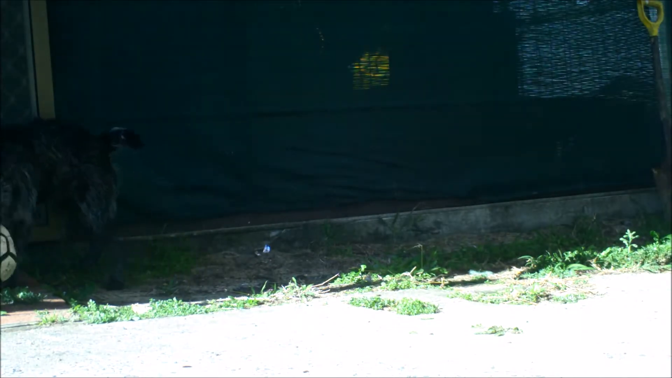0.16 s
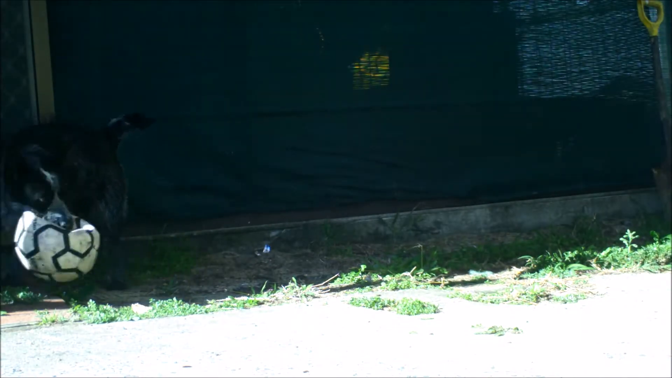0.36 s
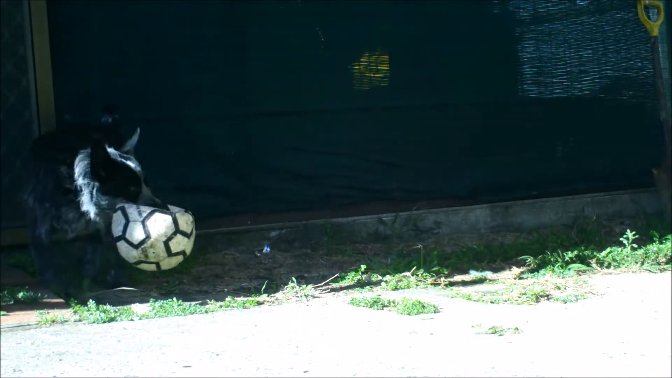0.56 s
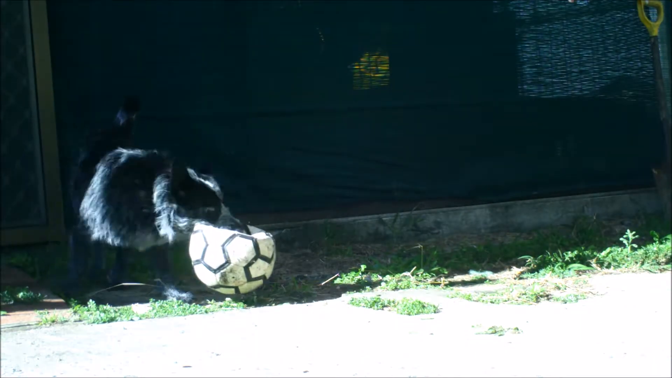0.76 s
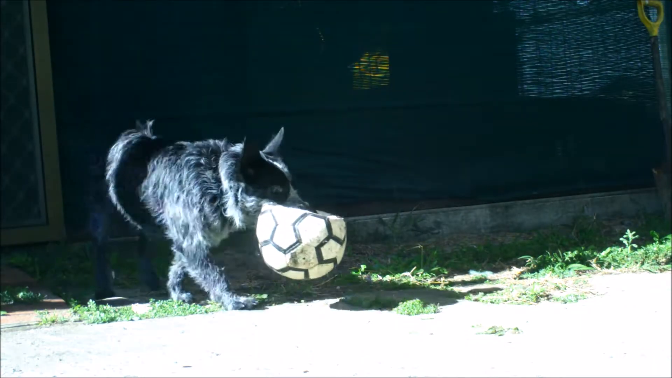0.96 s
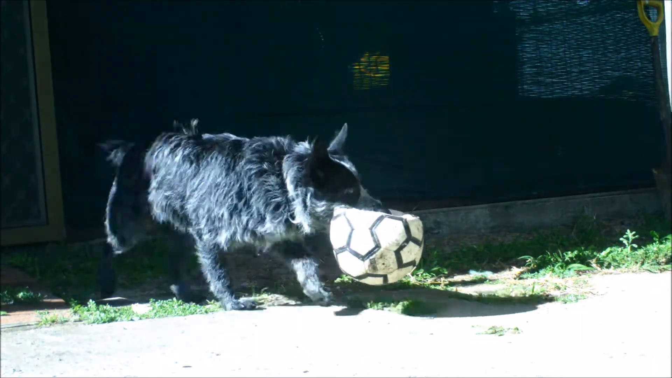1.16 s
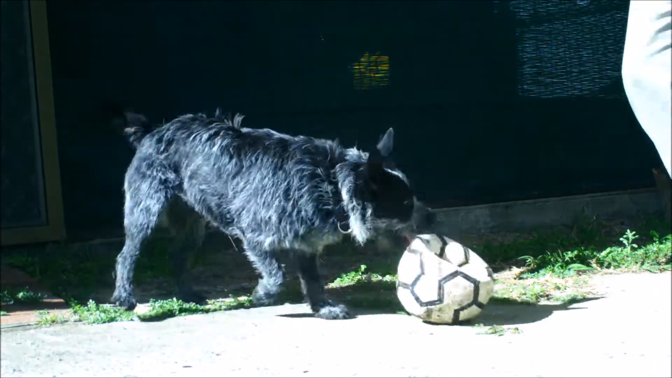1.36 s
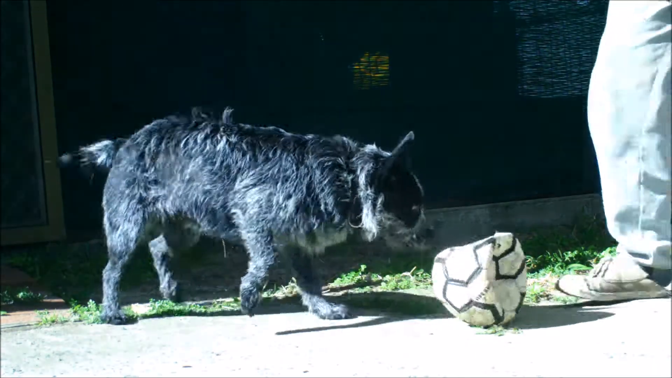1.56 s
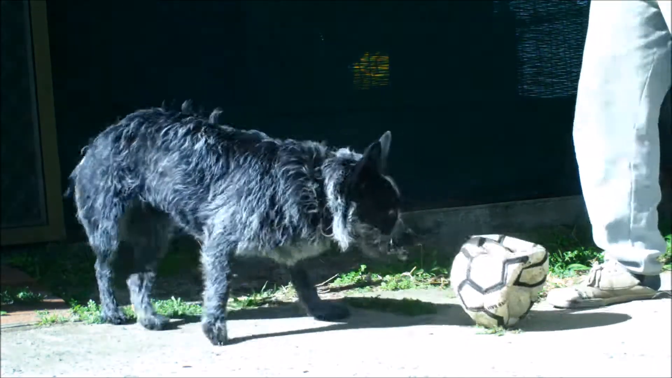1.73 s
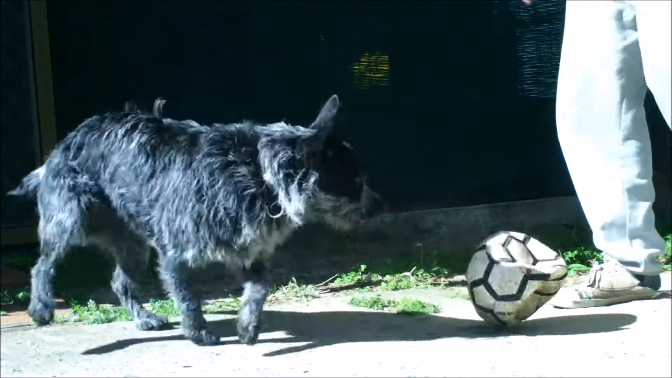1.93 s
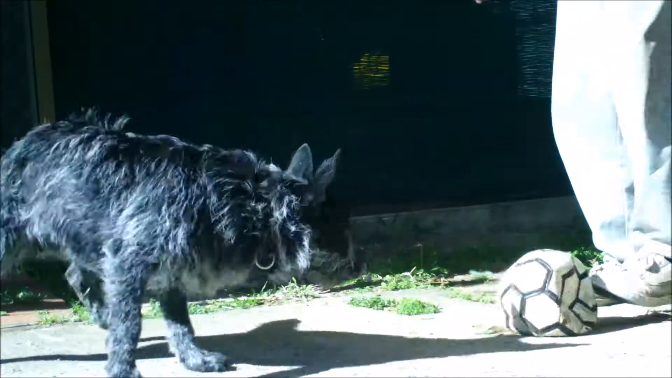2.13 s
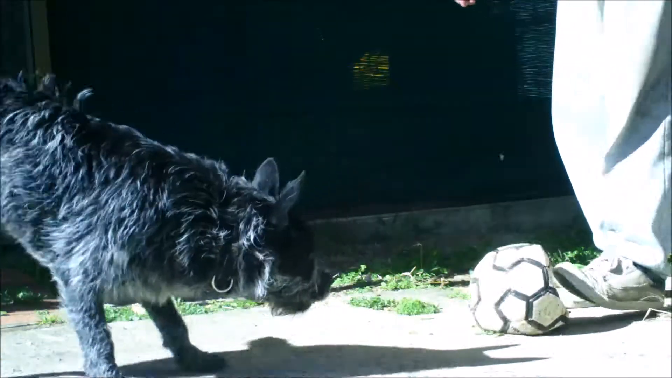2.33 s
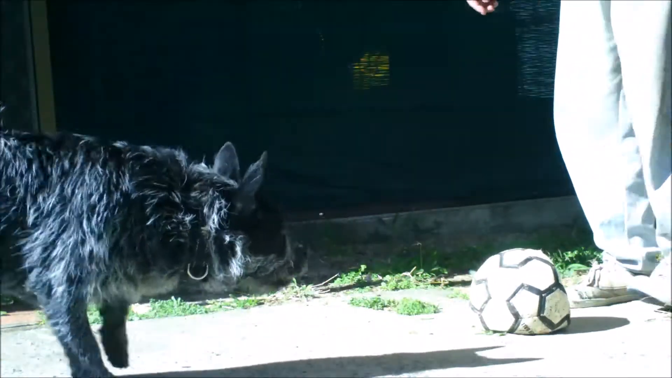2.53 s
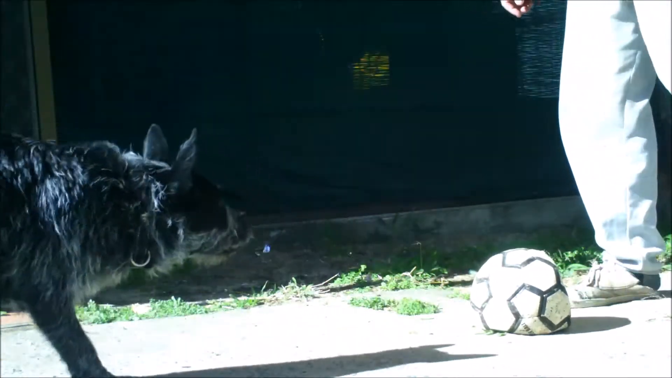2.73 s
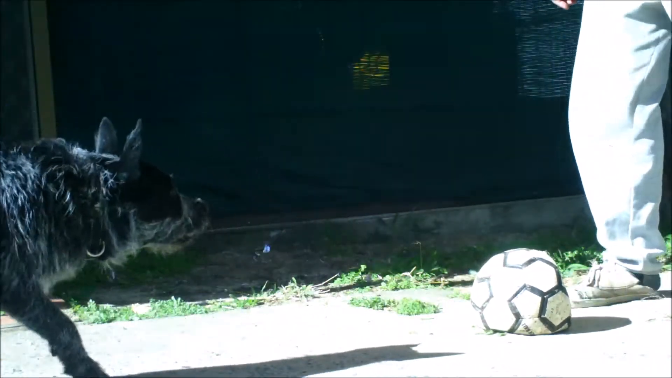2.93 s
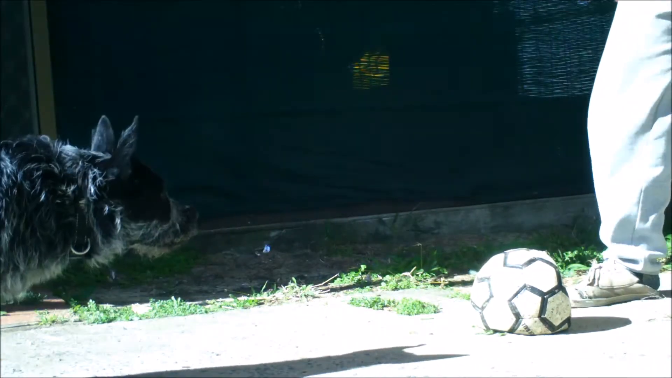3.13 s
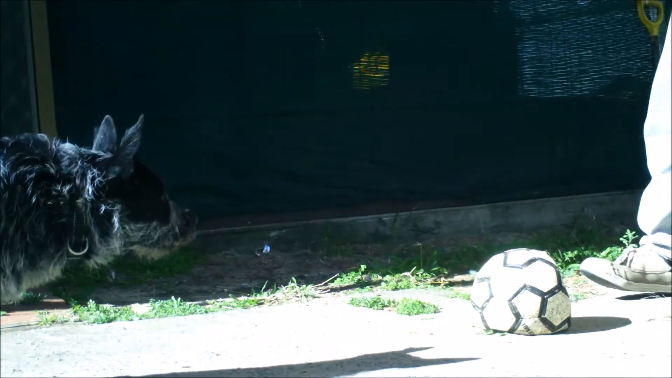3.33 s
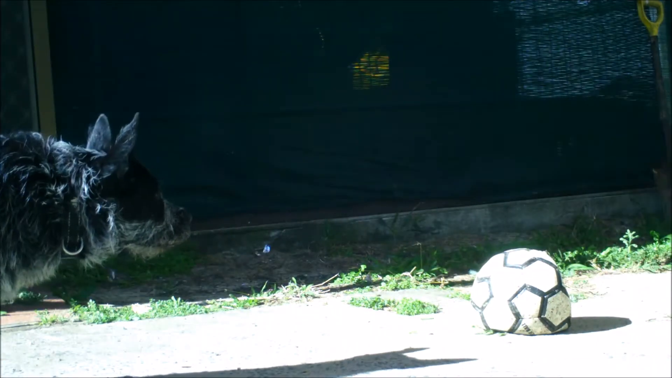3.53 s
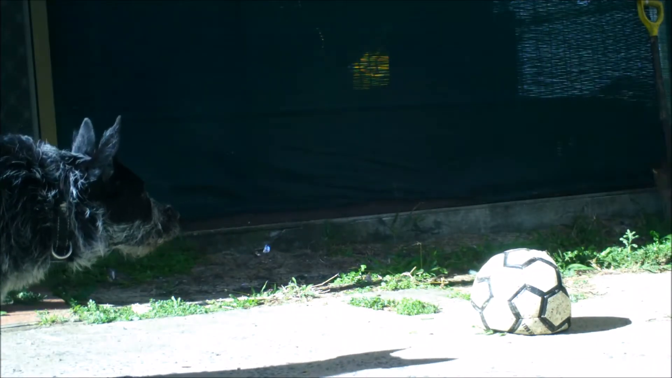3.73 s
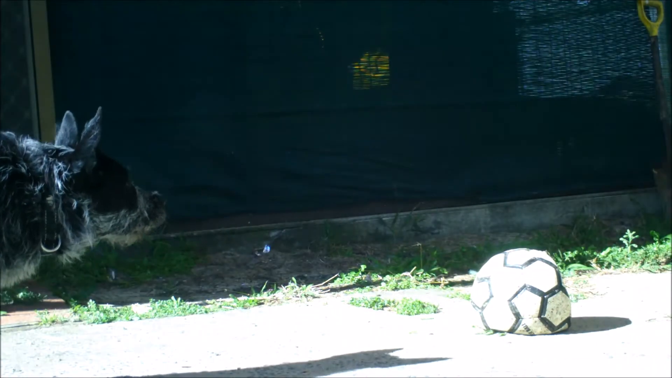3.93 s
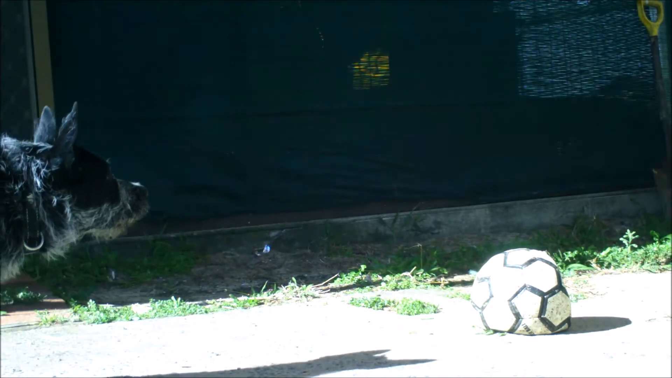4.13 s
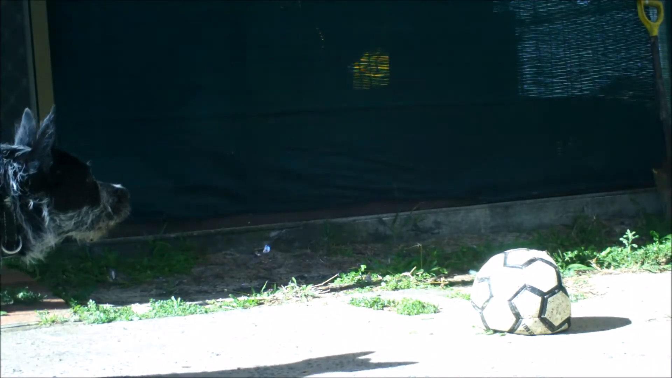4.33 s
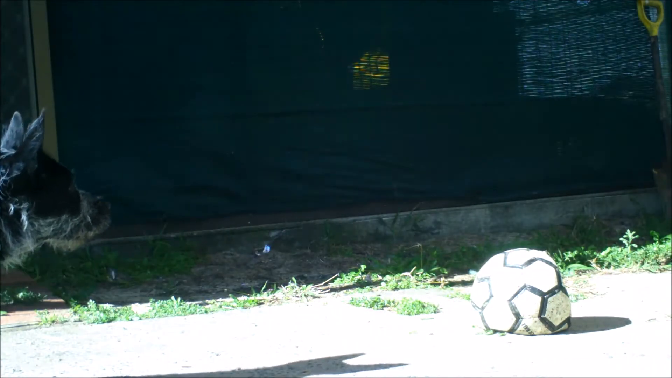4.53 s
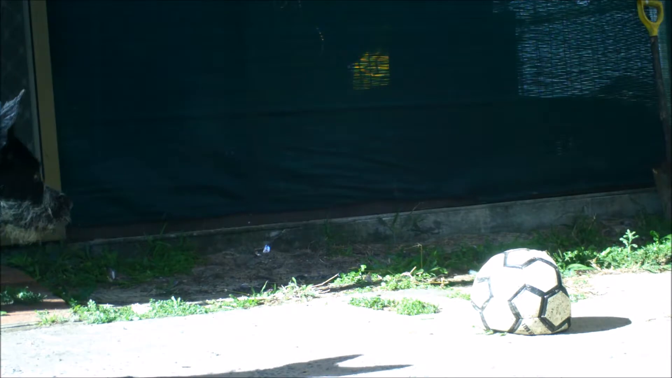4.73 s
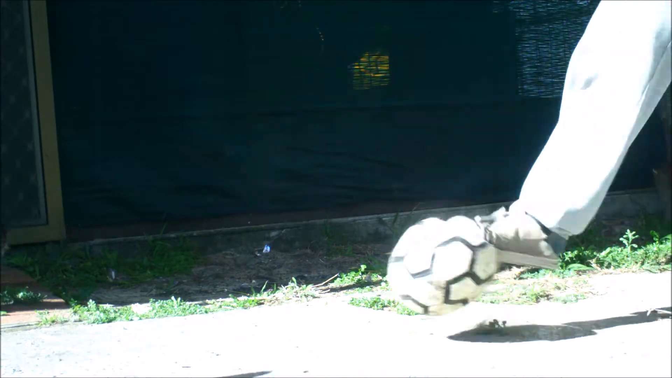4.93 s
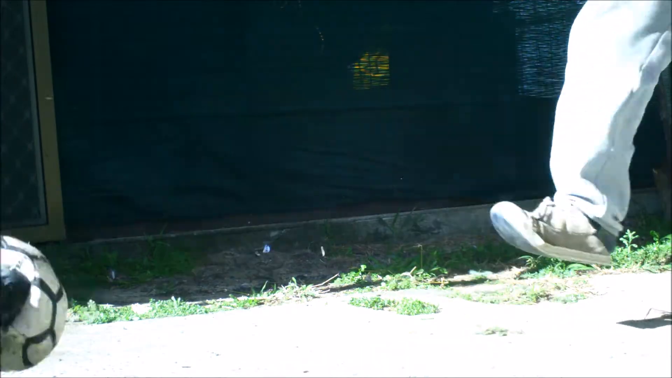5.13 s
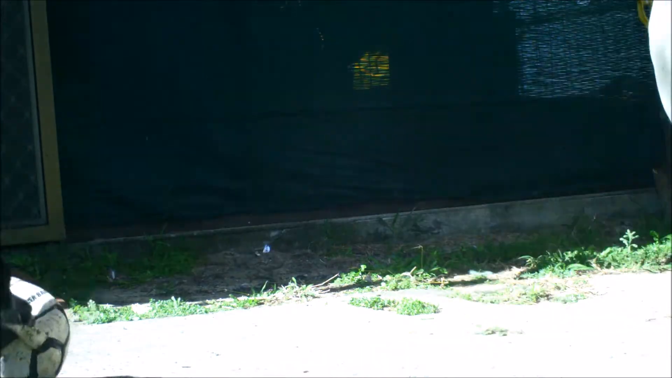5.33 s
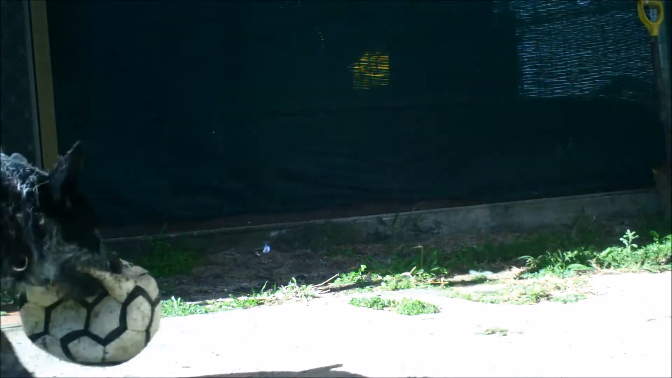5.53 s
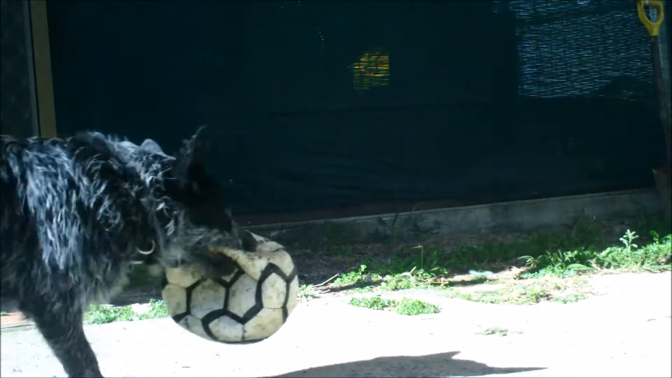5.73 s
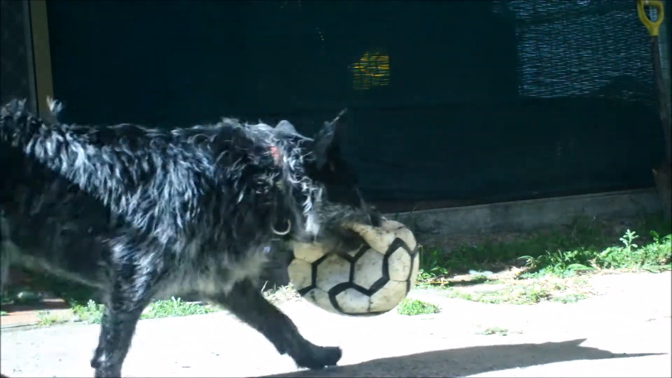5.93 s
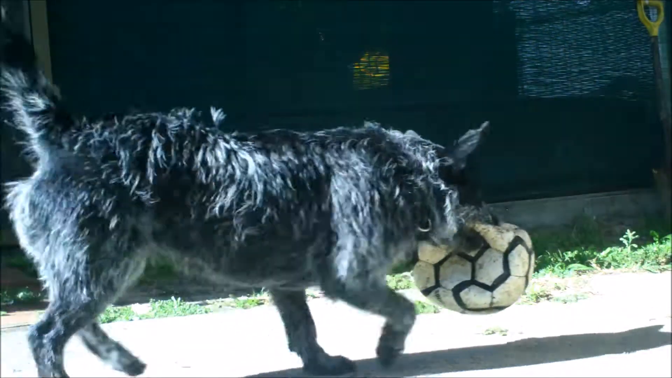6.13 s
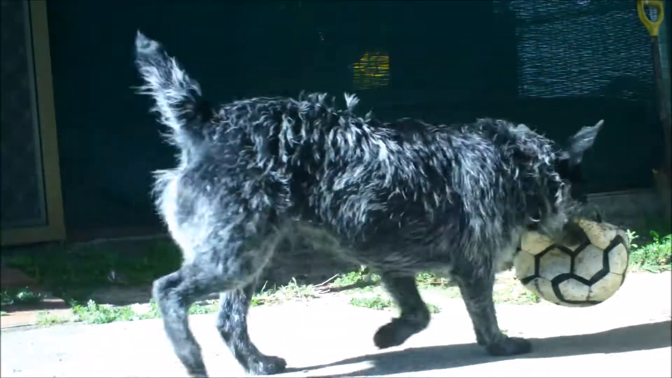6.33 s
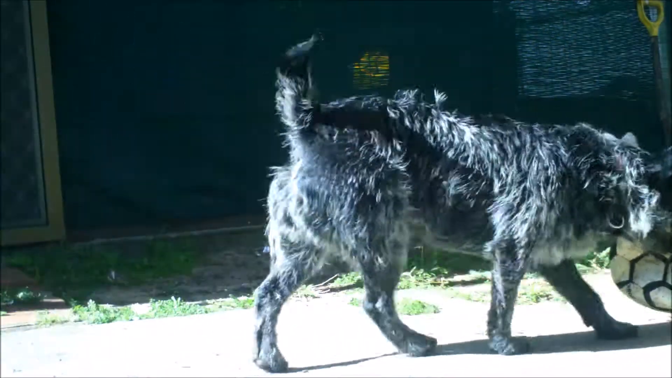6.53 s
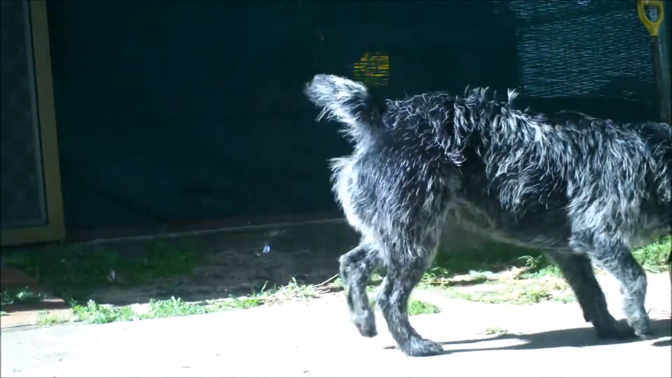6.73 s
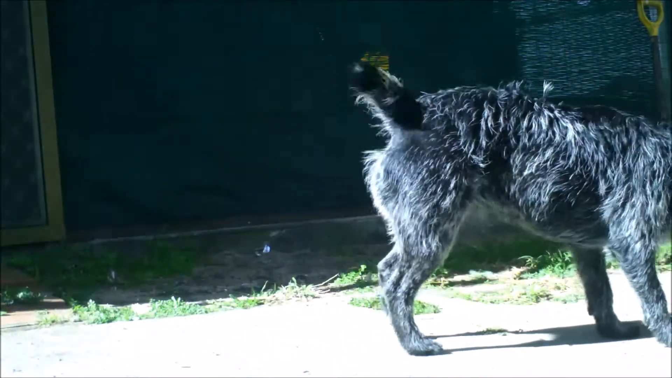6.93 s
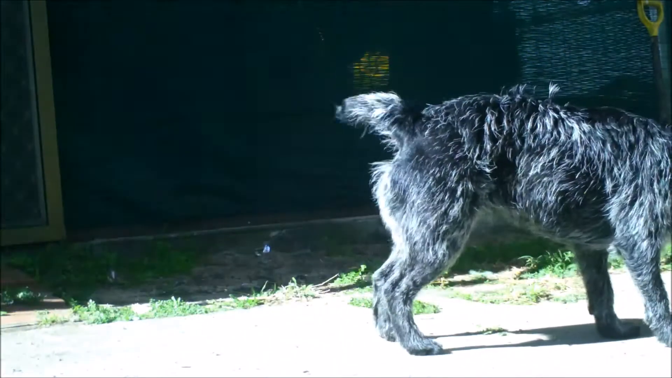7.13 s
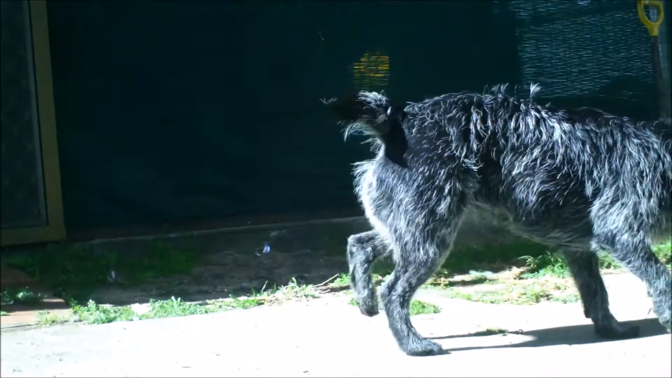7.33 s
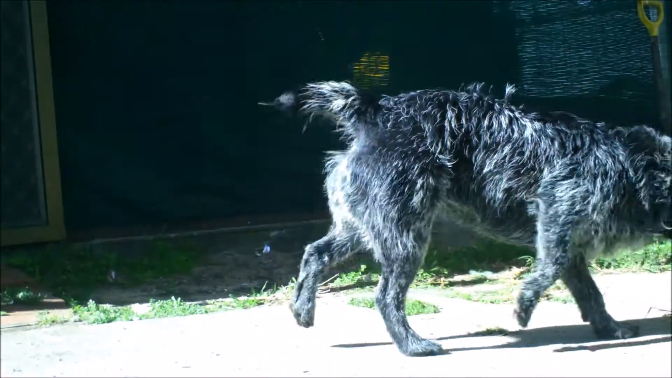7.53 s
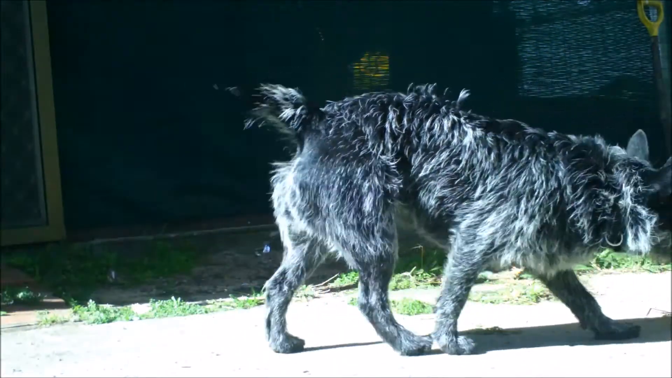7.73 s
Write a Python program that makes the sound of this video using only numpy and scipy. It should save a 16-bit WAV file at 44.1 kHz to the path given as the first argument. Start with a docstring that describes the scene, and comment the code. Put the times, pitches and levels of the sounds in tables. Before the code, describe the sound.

For the first half second a dog's paws scrape on gritty concrete close to the microphone, with a sharp click and a soft knock as it grabs a half-flat football. Around 1.4 and 1.6 seconds the ball drops with hollow, leathery slaps that ring briefly, and a lighter knock follows near 2.2 seconds. Until about 4.7 seconds there are only scattered scuffs of paws and shoes, claw ticks and small snaps of grit. At 4.8 seconds a tiny rubbery squeak leads into a kick, the loudest sound. The ball knocks again at 5.1 seconds, and the dog catches it with a sharp snap and slap near 5.3. Light paw steps, ticking claws and scrapes continue until the end, near 8 seconds. Nearby yard walls give a short echo, and faint distant traffic murmurs throughout under a steady hiss and a very thin high whine.

```python
"""A small walled yard of gritty concrete, the camera's microphone close to a dog with a half-flat football.
Paws scuff and claws tick as the dog carries the ball and drops it; the slack skin slaps, folds and rings.
Shoes scuff, and near five seconds a short squeak leads into a kick; the dog catches the ball and steps on.
Throughout, nearby walls answer and far traffic murmurs behind the hiss and thin whine of the camera."""
import sys
import numpy as np
from scipy import signal
from scipy.fft import rfft, irfft, next_fast_len
from scipy.io import wavfile
from scipy.ndimage import uniform_filter1d, map_coordinates

SR = 44100
rng = np.random.default_rng(int(sys.argv[2]) if len(sys.argv) > 2 else 0)


def bounce(signal):
    """Save signal as a 16-bit WAV file at the path given by the first command-line argument."""
    frames = np.transpose(np.atleast_2d(signal))
    limited = np.clip(frames, -1, 1)
    pcm = np.round(limited * 32767).astype(np.int16)
    wavfile.write(sys.argv[1], SR, pcm)


N = 342902
T = np.arange(SR) / SR  # one second, the longest an event lasts
HZ = np.fft.rfftfreq(SR, 1 / SR)
# colour of gritty concrete underfoot: frequency_hz, relative_db
CONCRETE_COLOUR = [(88, -59), (150, -16), (381, -13.5), (781, -4.5), (1370, -8), (1540, -5), (1760, -6),
                   (2020, 3.5), (2310, -1.5), (2860, 1.5), (3350, -1.5), (5760, -8), (7860, -13.5),
                   (8660, -14.5), (15500, -25.5)]


def ball(body_db, ring_db, free_ring_t60_s, ring_share, lowest_hz):
    """Slack panels slap and crumple; the skin and the air inside ring on."""
    # colour of a slap on leather: frequency_hz, relative_db
    leather = [(29, -58), (50, -27.5), (151, -14), (250, -16), (385, 2.5), (525, -5), (753, 0), (891, 0),
               (1110, -1), (1310, -6.5), (1590, -5), (3500, -11.5), (7920, -32.5), (10600, -31.5),
               (15500, -38)]
    # modes of the skin and the air inside: pitch_hz, relative_db
    modes = [(125, -25), (172, -11), (353, -10.5), (402, -6.5), (440, 3), (583, 2), (641, 0.5), (737, 9.5),
             (805, -4), (969, 10), (1069, -2), (1135, 7.5), (1229, -29), (1600, -8), (2154, -23),
             (2552, -1), (2635, -6), (2801, -12), (3030, -25), (3509, -5), (4306, -12)]
    mode_hz, mode_db = np.transpose(modes)
    bands = registers(leather) / (1 + (lowest_hz / (HZ + 1)) ** 6)
    track, t = np.zeros(N), T[:SR // 2]
    for start, rise, t60, thump, body, rasp, grit in slaps_and_folds():
        slap = contact(bands, [thump, body + body_db, rasp, grit], rise, t60,
                       grains_per_s=1100, grain_share=0.61)
        add(track, start, np.sqrt(1 - ring_share) * ground_bounce(slap, mean_delay_s=0.0013, gain=0.43))
        # each mode is pushed as hard as the slap is in its register
        push = [(125, thump + 13), (170, thump + 9), (350, body - 1), (1300, body), (2500, rasp + 3)]
        struck_db = mode_db + along(push, mode_hz) + rng.normal(0, 2.1, len(modes))
        strength = amp(struck_db) / np.linalg.norm(amp(mode_db)) * rng.choice([-1, 1], len(modes))
        ring = strength @ np.cos(2 * np.pi * mode_hz[:, None] * t)
        damping = 1 / free_ring_t60_s + 0.26 / t60  # whatever stops the slap also chokes the ring
        add(track, start, amp(ring_db - 60 * t * damping) * ring)
    return track


def slaps_and_folds():
    """A sharp slap, then a duller fold as the skin caves in: start_s, rise_s, t60_s, four band levels."""
    # the ball meeting ground, shoe or jaws:
    # start_s, fold_t60_s, slap_db, fold_over_slap_db, thump_over_slap_db, brightness_db
    blows = [(.203, 0.22, -45.5, -1, -7, -11), (1.355, 0.27, -35.5, -4.5, -19, 2.5),
             (1.608, 0.2, -42, 4, -40, -0.5), (2.17, 0.43, -47, -12, -3.5, -3),
             (2.427, .12, -51.5, -18, 9, 7), (4.916, 0.25, -25, -4, -2.5, -3.5),
             (5.134, 0.25, -33.5, -4, 1, -5.5), (5.274, 0.19, -34, -21, -26, 3),
             (5.292, 0.044, -29, -28, -17, -2.5), (5.499, 0.22, -44, -9.5, -31, -4)]
    for start, t60, slap_db, fold_over_db, thump_db, bright_db in blows:
        yield start, 0.0011, 0.61 * t60, slap_db + thump_db, *tilted(slap_db, bright_db, rasp_db=2.5)
        rise = 0.01 * 2 ** ((-30.5 - slap_db) / 19)  # a harder blow folds the skin sooner
        fold_db = slap_db + fold_over_db
        yield start + rise, rise, t60, fold_db + thump_db, *tilted(fold_db, bright_db - 2, rasp_db=2.5)


def paw_steps(gain_db, claws, claw_hz, claw_spread_s):
    """A pad pats the grit while its claws land one after another."""
    # paws set down: start_s, relative_db, brightness_db
    footfalls = [(1.778, -57.5, 7.5), (2.557, -56, 5), (2.717, -55.5, 10.5), (2.8642, -60.5, 8),
                 (3.33, -47.5, 0.5), (4.073, -56, -1.5), (5.813, -49.5, 7.5), (5.908, -66, 1),
                 (6.056, -47.5, 3.5), (6.337, -52.5, 1.5), (6.415, -51.5, 0.5), (6.677, -53.5, 2.5),
                 (7.065, -42, 1), (7.418, -62, 12), (7.441, -66, 6)]
    track, bands = np.zeros(N), registers(CONCRETE_COLOUR)[1:]
    for start, db, bright_db in footfalls:
        levels = tilted(db + gain_db, bright_db, rasp_db=2)
        pad = contact(bands, levels, rise_s=0.001, t60_s=0.16, grains_per_s=620, grain_share=0.35)
        add(track, start, pad)
        for claw in range(claws):
            late = claw_spread_s * (claw + rng.uniform(0, 0.5)) / claws
            octaves = 0.75 * bright_db + rng.normal(0, 0.14)  # brighter steps have higher claws
            peak_db = db + 10.5 + rng.normal(0, 5)
            add(track, start + late, tick(peak_db, claw_hz * 2 ** octaves, t60_s=0.0063))
    return track


def scuffs(gain_db, fade_db, lift_t60_s):
    """Pads and soles drag sand over the concrete: each stroke swells, fades, then lifts off."""
    # paws, shoes and ball dragged over grit: start_s, length_s, relative_db, brightness_db
    strokes = [(0, 0.23, -49.5, 2), (0.094, 0.098, -40.5, -3), (.14, 0.25, -43, 6), (0.201, .11, -39, -2),
               (0.241, 0.059, -36.5, 0.5), (0.297, 0.15, -45, 5.5), (0.401, .028, -48.5, 12.5),
               (0.555, .1, -61, 10), (0.877, 0.11, -53, -1.5), (0.934, 0.087, -51.5, -5.5),
               (1.339, 0.024, -50, -2.5), (1.49, .12, -55.5, -1), (1.843, 0.16, -48, 0.5),
               (1.916, 0.064, -48.5, -1.5), (2.061, 0.064, -57.5, 4.5), (2.155, 0.018, -52.5, -3),
               (2.205, 0.18, -52, 4.5), (2.276, .06, -46.5, 1), (2.456, .06, -53, 6.5),
               (2.981, 0.051, -51, 1.5), (3.248, 0.11, -50, 0.5), (3.704, 0.071, -38, -1.5),
               (3.754, 0.13, -53, -2.5), (4.532, .1, -42, -2), (4.673, 0.27, -53.5, -0.5),
               (5.027, 0.06, -49, 3), (5.132, .08, -44, 12), (5.196, 0.18, -58, 8),
               (5.321, .05, -42.5, -0.5), (5.36, 0.061, -57, 0), (5.519, .16, -45, -0.5),
               (5.679, 0.24, -55.5, -2.5), (5.797, 0.065, -58, 1), (6.314, 0.09, -56, -4),
               (7.236, .07, -57, -5), (7.304, 0.082, -62.5, 6), (7.681, 0.1, -47, -0.5)]
    track, bands = np.zeros(N), registers(CONCRETE_COLOUR)[1:]
    for start, length, db, bright_db in strokes:
        scrape = contact(bands, tilted(db, bright_db, rasp_db=3), rise_s=0.18 * length,
                         t60_s=length * 60 / fade_db, grains_per_s=750, grain_share=0.46)
        scrape *= decay(lift_t60_s, hold_s=length)
        add(track, start, ground_bounce(scrape, mean_delay_s=0.001096, gain=0.39))
    return amp(gain_db) * track


def snaps(gain_db):
    """Teeth, claws and small stones snap, standing out from the shuffling."""
    # single hard strikes: start_s, relative_peak_db, centre_hz, t60_s
    strikes = [(0.2254, -12.5, 4470, 0.0053), (0.951, -24, 1930, 0.0048), (1.1526, -21, 1630, 0.02),
               (1.1525, -20.5, 5430, 0.02), (1.6115, -24, 1920, 0.013), (1.63, -20, 1840, 0.11),
               (1.751, -34.5, 1430, 0.02), (2.173, -21.5, 2030, 0.061), (2.2507, -32, 2520, .008),
               (2.964, -36.5, 920, .026), (3.242, -30, 2080, 0.0058), (3.272, -27, 2365, 0.018),
               (3.289, -29.5, 2450, 0.019), (3.351, -29, 2100, .013), (3.708, -25.5, 2400, 0.015),
               (3.723, -24.5, 970, 0.026), (4.075, -34, 2200, 0.032), (4.534, -28, 4500, 0.0076),
               (4.548, -18, 2760, .008), (4.932, -9, 3350, .005), (5.046, -23.5, 2930, .03),
               (5.192, -21, 1180, 0.013), (5.2922, -9, 1360, 0.026), (5.371, -25.5, 2800, 0.041),
               (5.7353, -31, 2330, 0.027), (7.244, -34.5, 2340, 0.097), (7.6803, -27.5, 1950, .012)]
    track = np.zeros(N)
    for start, db, hz, t60 in strikes:
        add(track, start, tick(db + gain_db, hz, t60))
    return track


def tick(peak_db, hz, t60_s):
    """A hard tip strikes: a short crack through its own broad resonance."""
    burst = rng.standard_normal(SR // 12) * decay(t60_s)[:SR // 12]
    crack = signal.lfilter(*signal.iirpeak(min(hz, SR / 4), Q=2.75, fs=SR), burst)
    crack = ground_bounce(crack, mean_delay_s=0.0016, gain=0.41)
    crack = signal.lfilter(*signal.butter(2, 450, "high", fs=SR), crack)
    return amp(peak_db) * crack / np.abs(crack).max()


def squeak(start_s, level_db, from_hz, to_hz, glide_s, overtone_db, roughness):
    """A short falling rubbery chirp, as of a sole twisting before the kick."""
    hz = np.interp(T, [0, glide_s], [from_hz, to_hz])
    slip = unit(uniform_filter1d(rng.standard_normal(SR), size=50))
    phase = 2 * np.pi * np.cumsum(hz * (1 + roughness * slip)) / SR
    tone = np.sin(phase) + amp(overtone_db) * (np.sin(2 * phase) + 0.5 * np.sin(3 * phase))
    envelope = np.minimum(T / 0.0014, 1) * decay(0.042, hold_s=glide_s)
    track = np.zeros(N)
    add(track, start_s, amp(level_db) * tone * envelope)
    return track


def sand(motion, level_db, settle_s, follow_power, grains_per_s, spread_db, lowest_hz):
    """Stirred by feet and ball, single grains crack and skitter until they settle."""
    stir = signal.lfilter([1], [1, -np.exp(-1 / (settle_s * SR))], motion ** 2)
    size = amp(-spread_db * np.clip(rng.standard_normal(N), -2, 2)) * rng.choice([-1, 1], N)
    grains = (rng.random(N) < grains_per_s / SR) * size
    burst = rng.standard_normal(SR // 200) * decay(0.0054)[:SR // 200]
    crackle = signal.fftconvolve(grains, burst)[:N]
    crackle = signal.lfilter(*signal.butter(1, [lowest_hz, SR / 4], "band", fs=SR), crackle)
    return amp(level_db) * np.sqrt(stir / stir.mean()) ** follow_power * unit(crackle)


def contact(bands, levels_db, rise_s, t60_s, grains_per_s, grain_share):
    """A swelling, fading shower of tiny impacts, coloured by the material."""
    grains = (rng.random(SR) < grains_per_s / SR) * rng.choice([-1, 1], SR) * (0.5 + rng.random(SR))
    force = np.sqrt(grain_share) * unit(grains) + np.sqrt(1 - grain_share) * rng.standard_normal(SR)
    stroke = np.minimum(T / rise_s, 1) * decay(t60_s, hold_s=rise_s)
    power = amp(levels_db) ** 2 @ bands
    return irfft(rfft(force * stroke) * minimum_phase(np.sqrt(power))) * np.sqrt(power.mean())


def ground_bounce(sound, mean_delay_s, gain):
    """The slab mirrors a sound to the microphone a moment later, combing it differently at each spot."""
    lag = int(mean_delay_s * SR * rng.uniform(0.5, 1.5))
    return (sound + gain * np.pad(sound, (lag, 0))[:len(sound)]) / np.hypot(1, gain)


def yard_echo(sound, wall_s, wall_db, tail_db):
    """A close wall throws back a scattered echo; a short diffuse tail follows."""
    # how long the yard rings: frequency_hz, t60_s
    ring_times = [(100, 0.38), (500, 0.36), (2000, 0.37), (6000, 0.34), (14000, 0.28)]
    track, block = np.zeros(N), SR // 3
    for start in range(0, N, block):  # each block meets a fresh scatter of reflections
        hz, t, noise = signal.stft(rng.standard_normal(SR // 2), SR, nperseg=256)
        fade = amp(-60 * t / along(ring_times, hz)[:, None])
        tail = signal.istft(noise * fade, SR, nperseg=256)[1][:SR // 2]
        tail *= np.minimum(T[:len(tail)] / 0.0059, 1)
        late = T[:len(tail)] - wall_s
        wall = rng.standard_normal(len(tail)) * (late > 0) * amp(-60 * np.abs(late) / 0.011)
        answer = amp(tail_db) * tail / np.linalg.norm(tail) + amp(wall_db) * wall / np.linalg.norm(wall)
        add(track, start / SR, signal.fftconvolve(sound[start:start + block], answer))
    return track


def traffic_and_hiss(level_db):
    """Far traffic swells and ebbs under steady microphone hiss."""
    # colour of traffic and hiss together: frequency_hz, relative_db
    colour = [(15, -43), (25, -24), (482, -4.5), (567, -3), (648, -3), (871, -1.5), (1660, -7),
              (1850, -7.5), (2700, -10.5), (3000, -11.5), (5880, -15.5), (7910, -19), (9050, -22),
              (13900, -20), (15500, -17)]
    # slow drift of the traffic: time_s, relative_db
    murmur = [(0, -54), (.8, -57.5), (2.8, -59), (4.3, -57), (5.8, -57), (6.9, -57.5), (7.78, -53.5)]
    murmur_db, = curves(murmur)
    air = unit(filtered(rng.standard_normal(N), lambda hz: amp(along(colour, hz))))
    traffic = filtered(air, lambda hz: 1 / (1 + (hz / 3000) ** 2))
    swell = amp(murmur_db - murmur_db.mean() + 0.74 * wobble(6.3))
    return amp(level_db) * (air + traffic * (swell - 1))


def distant_engine():
    """One engine far off hums on two harmonics as it changes speed."""
    # the engine's course: time_s, pitch_hz, fundamental_db, octave_db
    course = [(0, 80.4, -126, -83), (1.1, 82, -101, -110), (1.7, 85.5, -83, -88), (2.3, 64.8, -87, -81),
              (2.8, 63.7, -85.5, -89), (3.5, 91.4, -81, -80), (5.6, 68.9, -93, -85),
              (6.5, 73.3, -91, -84.5), (7.78, 81.9, -95, -74)]
    pitch_hz, fundamental_db, octave_db = curves(course)
    phase = 2 * np.pi * np.cumsum(pitch_hz * (1 + 0.01 * wobble(12))) / SR
    return np.sqrt(2) * (amp(fundamental_db) * np.sin(phase) + amp(octave_db) * np.sin(2 * phase))


def camera_whine(line_db, skirt_db):
    """The camera's line-scan tone and a fuzzy band just under it."""
    line = np.sqrt(2) * np.sin(2 * np.pi * 15734 * np.arange(N) / SR)
    skirt = filtered(rng.standard_normal(N), lambda hz: np.exp(-((hz - 15690) / 60) ** 2))
    return amp(line_db) * line + amp(skirt_db) * unit(skirt)


def registers(colour):
    """A material's colour split into thump, body, rasp and grit, each of power 1."""
    # borders of the four bands: edge_hz
    edges = [20, 300, 1500, 5000, 20000]
    below = [1 / (1 + (HZ / edge) ** 8) for edge in edges]
    power = np.abs(np.diff(below, axis=0)) * amp(along(colour, HZ)) ** 2
    return power / power.mean(axis=1, keepdims=True)


def tilted(db, bright_db, rasp_db):
    """Body, rasp and grit levels of a contact: brightness trades body for grit."""
    return [db - bright_db, db + rasp_db, db + bright_db]


def minimum_phase(gain):
    """The spectrum of this shape whose impulse response starts at once; energy 1."""
    cepstrum = irfft(np.log(np.maximum(gain / gain.max(), 1e-5)))
    cepstrum[1:SR // 2] *= 2
    cepstrum[SR // 2 + 1:] = 0
    spectrum = np.exp(rfft(cepstrum))
    return spectrum / np.linalg.norm(irfft(spectrum))


def decay(t60_s, hold_s=0):
    """An envelope that holds, then falls 60 dB every t60_s."""
    return amp(-60 * np.maximum(T - hold_s, 0) / t60_s)


def amp(db):
    """Decibels to gain."""
    return 10 ** (np.asarray(db) / 20)


def unit(x):
    """Scale to rms 1."""
    return x / np.sqrt(np.mean(x ** 2) + 1e-20)


def along(points, hz):
    """(Hz, value) points read on a log axis."""
    point_hz, values = np.transpose(points)
    return np.interp(np.log(hz + 1), np.log(point_hz + 1), values)


def curves(rows):
    """One value per sample for each column after the time."""
    times, *columns = np.transpose(rows)
    return [np.interp(np.arange(N) / SR, times, column) for column in columns]


def wobble(knots_per_s):
    """A smooth random curve."""
    knots = rng.standard_normal(int(N * knots_per_s / SR) + 4)
    return map_coordinates(knots, [np.arange(N) * knots_per_s / SR])


def filtered(x, response):
    """x times a response of frequency."""
    size = next_fast_len(N + SR // 2)
    return irfft(rfft(x, size) * response(np.fft.rfftfreq(size, 1 / SR)), size)[:N]


def add(track, start_s, sound):
    """Mix a sound into the track."""
    part = track[max(round(start_s * SR), 0):][:len(sound)]
    part += sound[:len(part)]


def scene():
    """Dog, ball and shoes close to the microphone, walls around them, traffic far off; mono."""
    near = scuffs(gain_db=-1.23, fade_db=18.5, lift_t60_s=0.14)
    near += ball(body_db=-1, ring_db=-1, free_ring_t60_s=0.23, ring_share=0.23, lowest_hz=122)
    near += paw_steps(gain_db=-2, claws=3, claw_hz=3150, claw_spread_s=0.02)
    near += snaps(gain_db=-4.5)
    near += squeak(start_s=4.771, level_db=-35, from_hz=1112, to_hz=792, glide_s=0.0221,
                   overtone_db=-6.5, roughness=0.11)
    near += sand(near, level_db=-61, settle_s=0.16, follow_power=0.62, grains_per_s=500,
                 spread_db=0.5, lowest_hz=1790)
    near = signal.lfilter(*signal.butter(2, 85, "high", fs=SR), near)  # small things radiate no deep bass
    echo = yard_echo(near, wall_s=0.011, wall_db=-12.5, tail_db=-9)
    background = traffic_and_hiss(level_db=-56.5) + distant_engine()
    return (near + echo + background + camera_whine(line_db=-75, skirt_db=-74))[None]


def record(dry):
    """The camera has a narrow notch in the treble and a band limit."""
    notch_hz, top_hz = 7850, 15950
    notch = lambda hz: 1 - 0.85 * np.exp(-((hz - notch_hz) / 170) ** 2)
    return filtered(dry[0], lambda hz: notch(hz) * (hz < top_hz))[None]


dry = scene()
out = record(dry)
bounce(out)
```